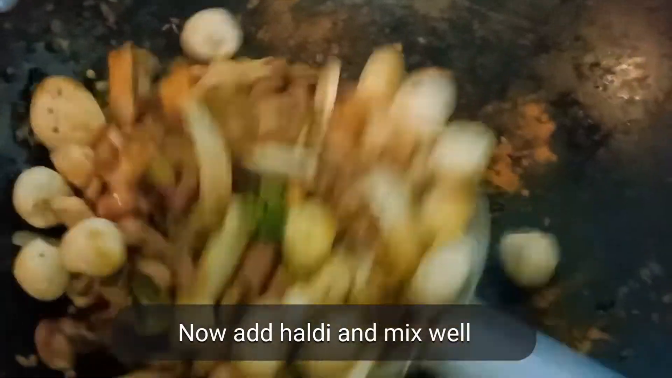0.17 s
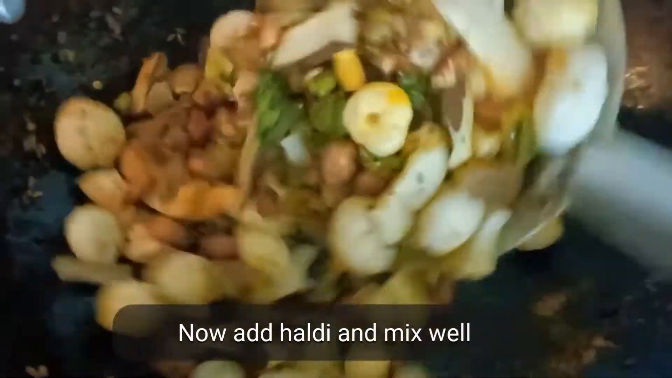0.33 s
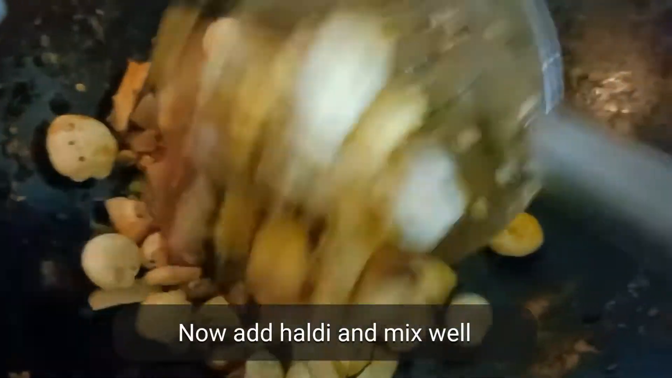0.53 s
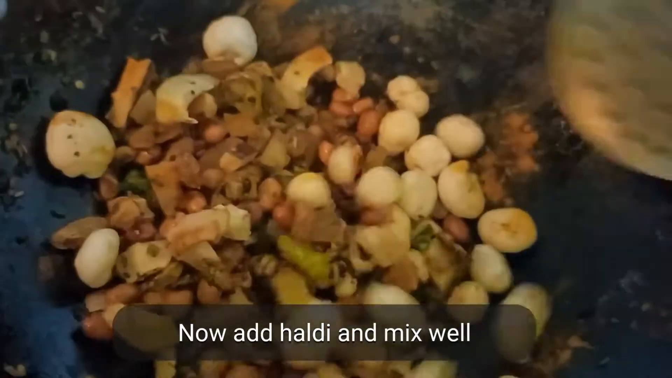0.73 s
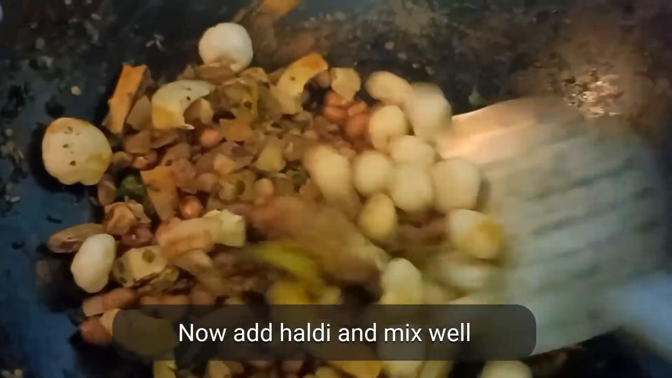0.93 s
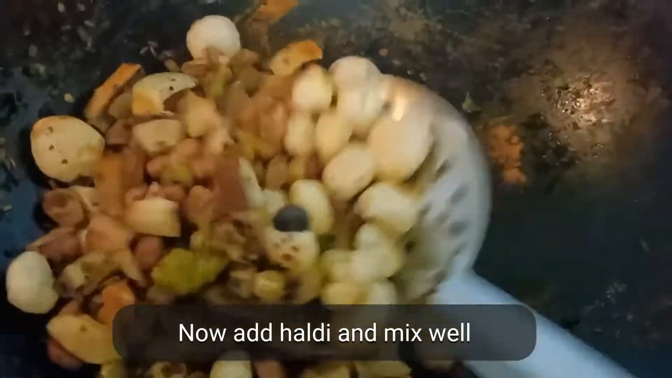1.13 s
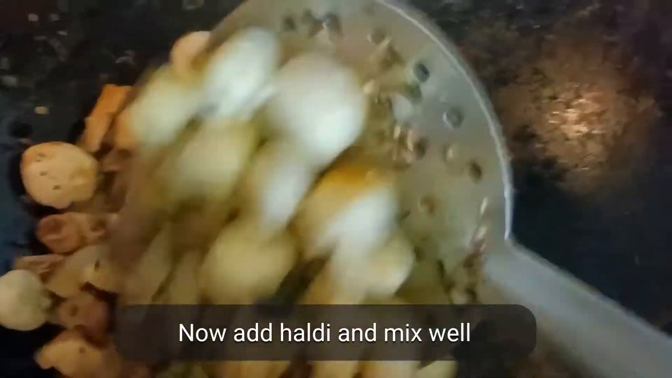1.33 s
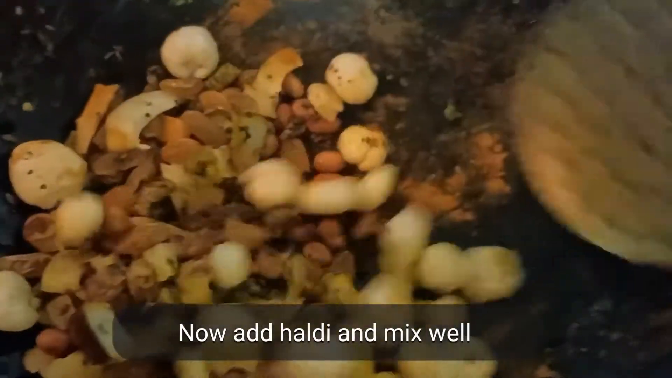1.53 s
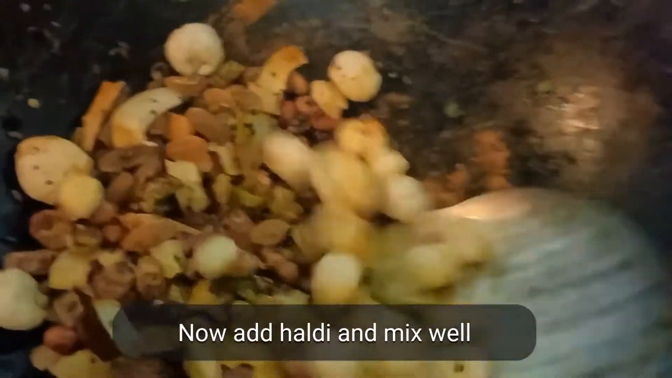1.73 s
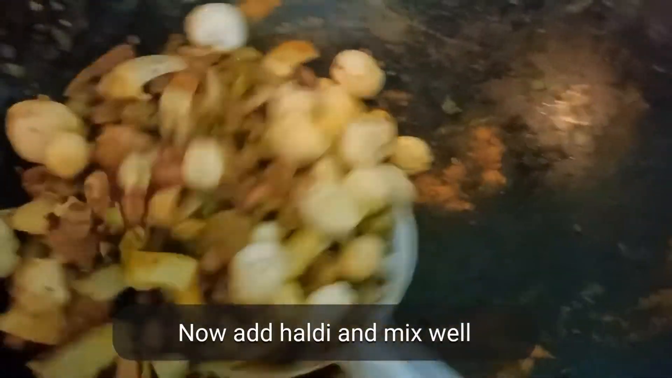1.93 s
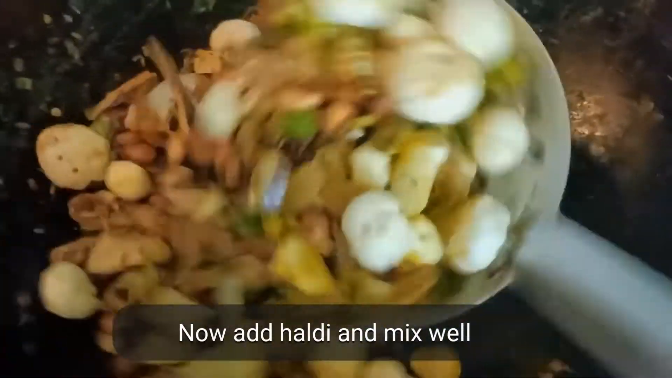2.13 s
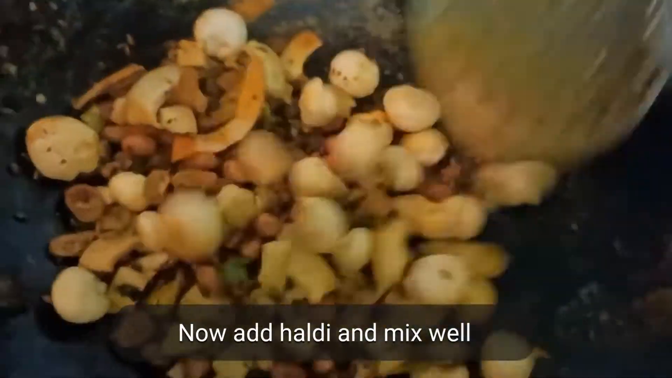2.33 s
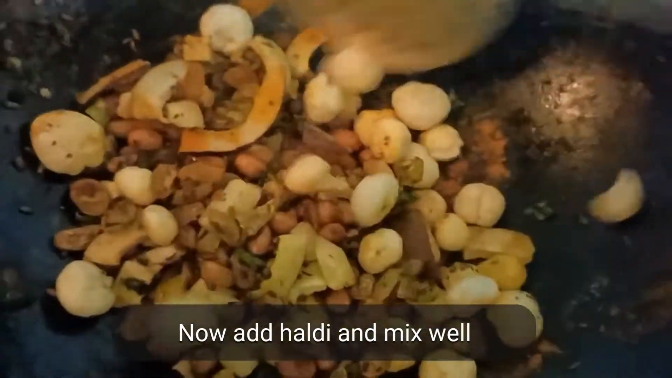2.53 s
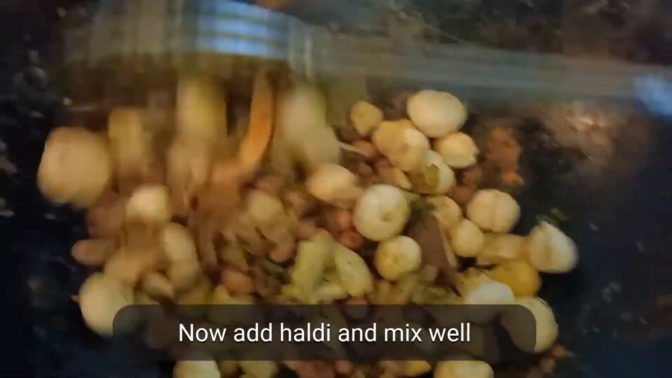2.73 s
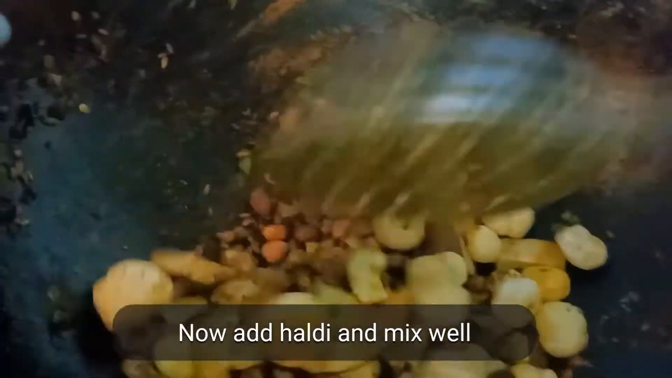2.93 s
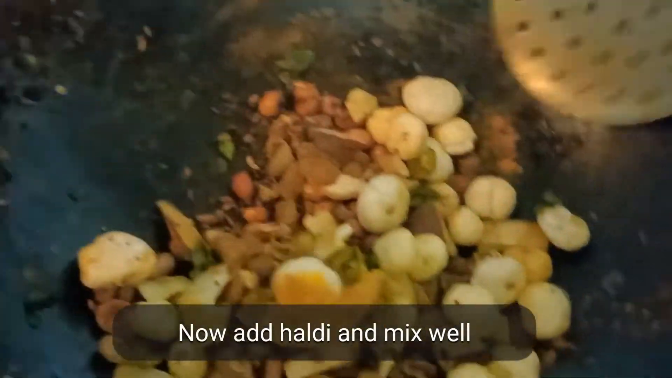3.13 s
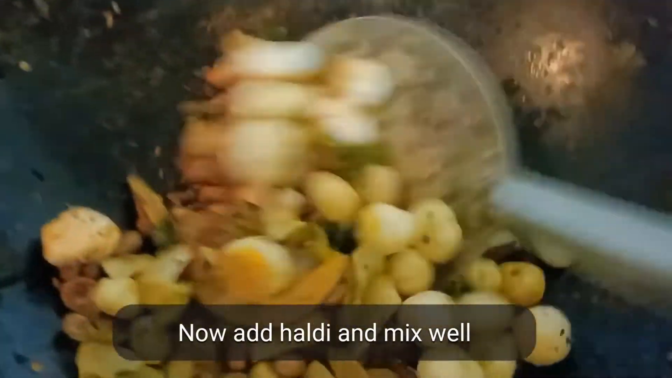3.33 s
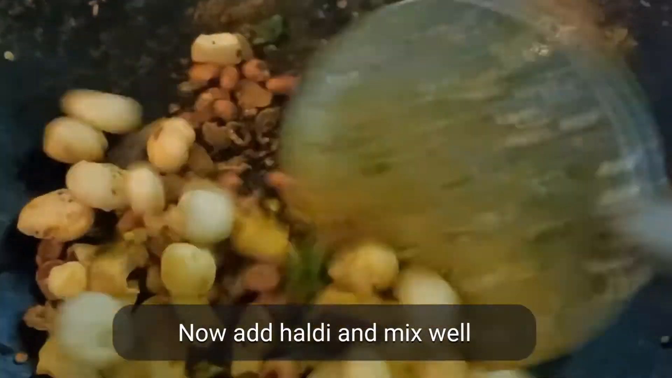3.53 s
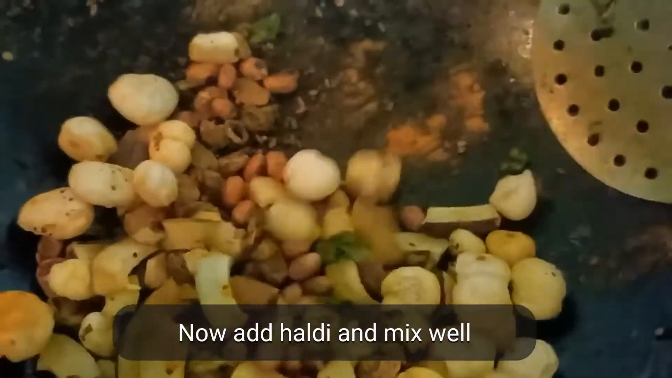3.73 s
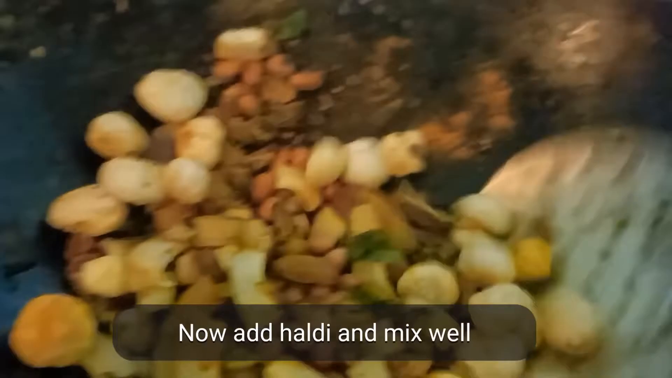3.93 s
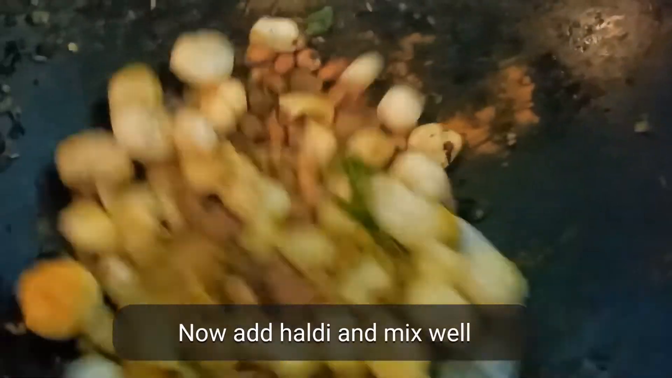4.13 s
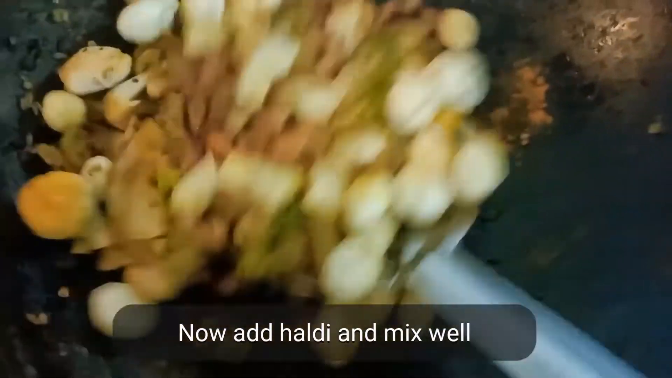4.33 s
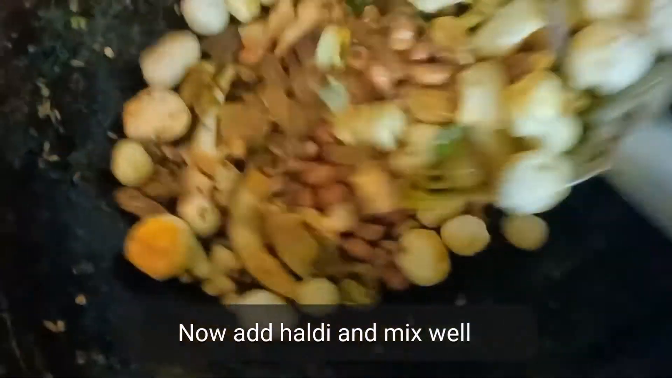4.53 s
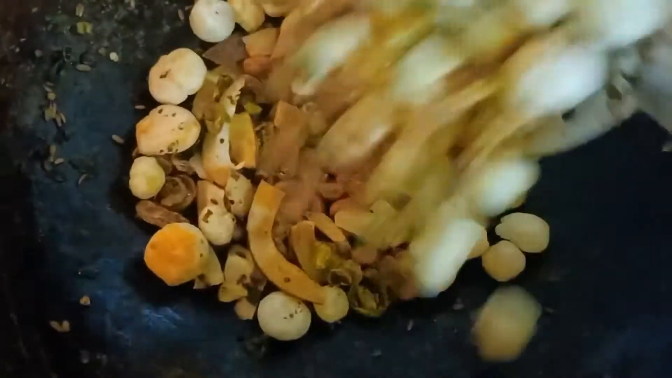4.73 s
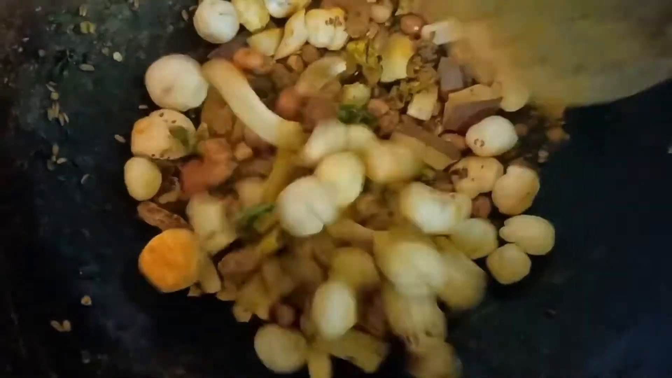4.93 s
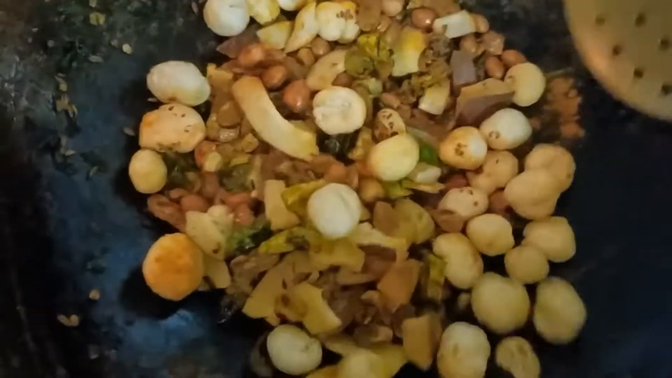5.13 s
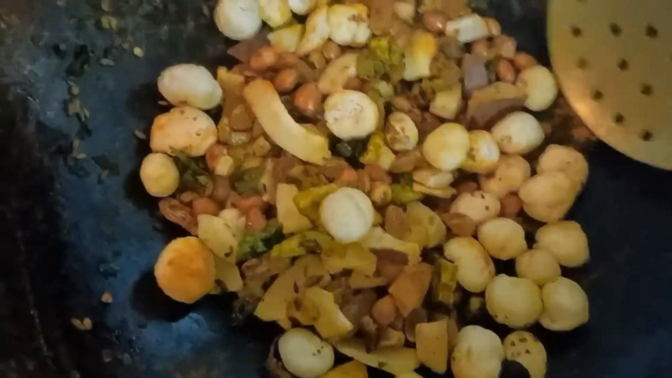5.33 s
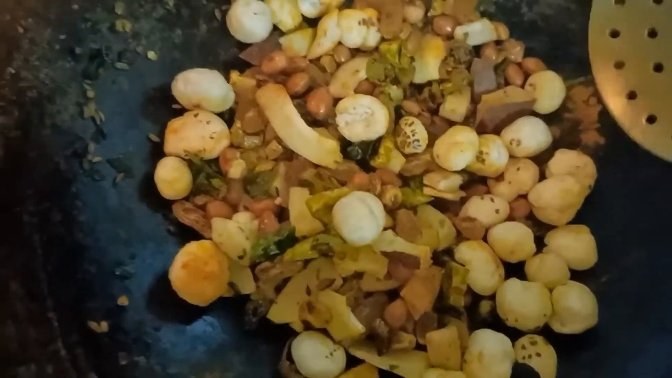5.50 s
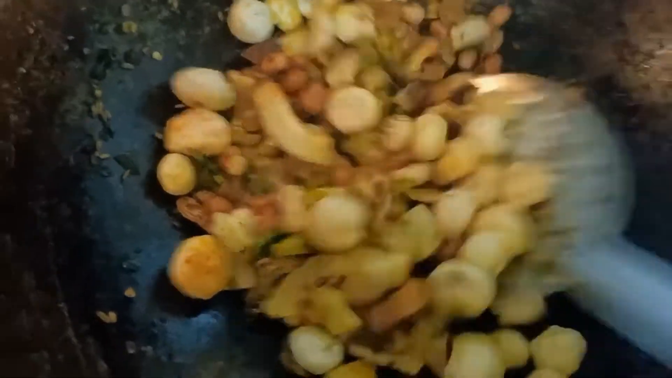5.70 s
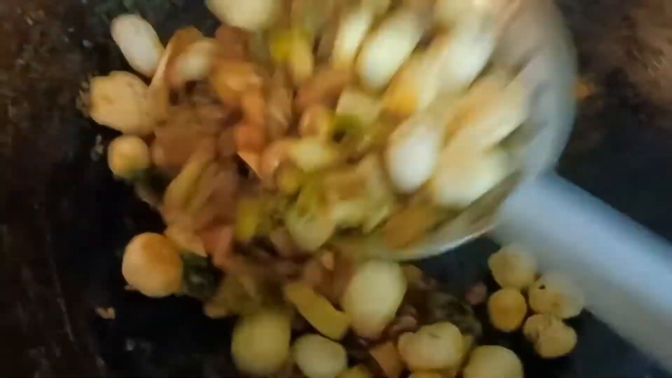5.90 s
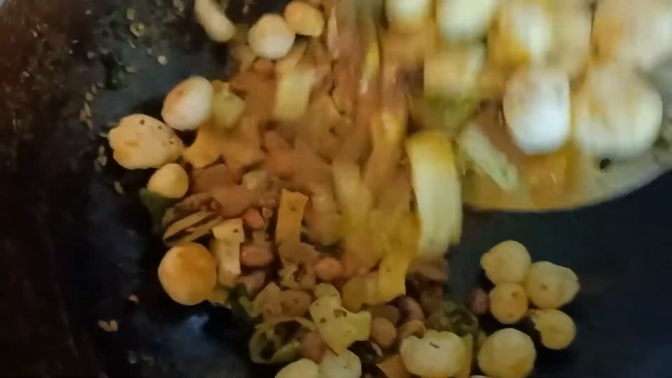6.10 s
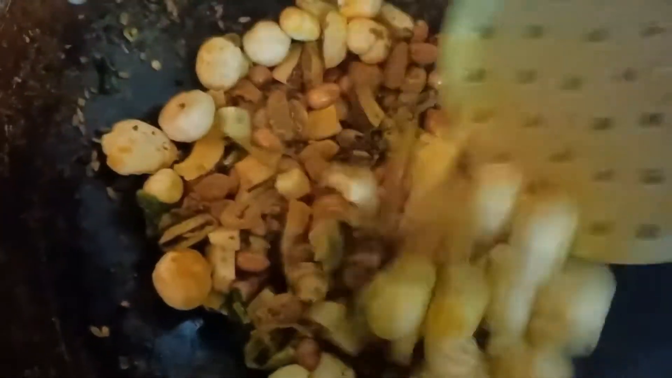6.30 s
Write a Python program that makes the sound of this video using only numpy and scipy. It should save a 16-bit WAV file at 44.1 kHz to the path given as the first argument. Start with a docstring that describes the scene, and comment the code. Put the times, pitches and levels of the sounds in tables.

```python
"""In a kitchen, close by, a perforated steel spatula stirs nuts and coconut flakes roasting in a metal pan.
The blade lands with a clank of bursts and ringing modes, then scrapes along as tiny slips drive steel and pan.
It lifts, and the dry mix slides off and tumbles back: showers of small impacts through flake, nut and steel tones.
Single nuts tap as pitched clicks, one rattles briefly on the blade, and something hollow gives one soft thud.
Shaped noise lays a low rumble and a faint hiss underneath; a short room tail answers the near sounds."""
import sys
import numpy as np
from scipy import signal
from scipy.fft import rfft, irfft, next_fast_len
from scipy.io import wavfile
from scipy.ndimage import uniform_filter1d, map_coordinates

SR = 44100
rng = np.random.default_rng(int(sys.argv[2]) if len(sys.argv) > 2 else 0)


def persist_wave(psi):
    """Save psi, clipped to +-1, as 16-bit WAV."""
    counts = np.round(np.clip(psi, -1, 1) * 32767).astype(np.int16)
    wavfile.write(sys.argv[1], SR, np.atleast_2d(counts).T)


N = 284826  # length in samples

# Colour of the steady hiss. Each row: frequency in Hz, density in dB per Hz.
HISS_SPECTRUM = [(100, -1.5), (250, -7), (500, -4.5), (1500, -7), (3000, -5.5), (6000, -7), (9000, -7.5),
                 (12000, -2), (15500, -13)]
# Colour of the low rumble. Each row: frequency in Hz, density in dB per Hz.
RUMBLE_SPECTRUM = [(15, 7.5), (30, -11.5), (70, -1), (130, -3.0), (190, -11.0), (600, -28.0), (3000, -79)]
# Decay of the room. Each row: frequency in Hz, time to fall by 60 dB in seconds.
ROOM_DECAY = [(200, 0.46), (1500, 0.12), (5000, 0.099), (14000, 0.1)]
# Stereo width. Each row: frequency in Hz, gain of the side signal in dB.
STEREO_WIDTH = [(60, -8), (200, -11), (380, -7), (700, -3), (1300, 0), (2400, 1), (4400, -.5), (8000, -3),
                (15000, -2)]

# One dull rounded thud, built from two overlapping soft pushes. Each row: start in seconds, relative level in dB.
THUD_PUSHES = [(0.529, -23.5), (0.557, -26.5)]
# Hollow modes of the thud. Each row: frequency in Hz, width in Hz, relative level in dB.
THUD_MODES = [(310, 70, -4), (430, 80, -5), (540, 40, 1), (620, 55, -4), (820, 60, -10)]
# Soft push that drives the thud. Each row: frequency in Hz, gain in dB.
PUSH_SPECTRUM = [(120, -25), (280, 0), (800, 0), (1300, -35), (4000, -70)]

# Single nuts tapping pan and blade. Each row: start in seconds, relative level in dB, pitch in Hz,
# relative level of the dry snap in dB, after-ring against the click in dB (before trim).
TAPS = [(0.3256, -35, 5560, -52, 13), (0.4186, -22.5, 5640, -34, -6), (0.637, -17, 2410, -38, -8),
        (0.6903, -30.5, 6460, -26, 5), (1.326, -20, 1820, -55, -2), (1.993, -38, 5240, -24, 10),
        (2.2518, -13, 4530, -41.5, -6.5), (2.438, -22.5, 2500, -50, -12), (3.1266, -34, 5760, -42, -10),
        (3.467, -20, 5930, -44, -5.5), (3.5451, -24.5, 2560, -46, -21), (3.829, -4.5, 3650, -33, -4),
        (4.194, -8.5, 6500, -36, -9), (4.5409, -22, 4700, -44, -4), (4.6868, -30.5, 5000, -54, 9.5),
        (4.8107, -40, 7460, -53, 10.5), (4.862, -20.5, 2700, -15.5, -13), (4.9395, -13.5, 5200, -28, 0),
        (5.137, -40, 5840, -38, 2), (6.3794, -19, 1980, -40, -11), (6.393, -18, 2440, -47, -2)]
# The blade carries the rustling mix. Each row: start in seconds, length in seconds, relative flake level in dB.
CARRIES = [(0.135, 0.76, -49), (1.148, 0.74, -52.5), (1.996, 0.62, -50.5), (2.738, 0.2, -47.5),
           (3.442, 0.58, -50.5), (4.295, 0.71, -51), (5.803, 1, -51.5)]
# A load slides off and falls back. Each row: start in seconds, swell time in seconds, settling in dB per second,
# then the relative levels of flakes, nuts and sliding on steel in dB.
SPILLS = [(0.3, 0.09, 52, -51, -46.5, -52), (0.605, 0.029, 110, -33, -46, -46),
          (1.47, 0.049, 129, -37, -52, -66), (2.301, 0.087, 157, -34, -49.5, -41),
          (2.8, 0.049, 91.5, -43.5, -71, -42.5), (3.571, 0.07, 68, -46.5, -60, -52),
          (4.49, 0.05, 160, -45.5, -48, -51), (4.845, 0.15, 121, -35.5, -46, -46.5),
          (5.86, 0.042, 72, -53, -71, -45.5), (6.14, 0.03, 260, -42, -52.5, -49),
          (6.3, 0.078, 17, -39, -48, -50)]
# Crackle of flakes and dry skins. Each row: frequency in Hz, density in dB per Hz.
FLAKE_SPECTRUM = [(1000, -14.5), (3000, -3.5), (3700, -15), (6000, -10), (8500, -5.5), (12500, 1),
                  (14500, -5.5), (16000, -6)]
# Patter of nuts. Each row: frequency in Hz, density in dB per Hz.
NUT_SPECTRUM = [(100, -7), (250, -3), (600, 2.5), (1400, -2), (2600, -2), (3500, -3), (6000, 5.5),
                (14000, -31)]

# The blade strikes or catches on the pan. Each row: start in seconds, relative level of the strike in dB,
# relative level of the pan body in dB, time of the chatter to fall by 60 dB in seconds.
CLANKS = [(0.0318, -5, -37, 0.1), (0.1021, -6.5, -30.5, 0.023), (0.8393, -7, -27.5, 0.043),
          (0.9374, -28, -39, 0.054), (1.0818, -6, -58, 0.05), (1.6685, -7, -26, 0.098),
          (2.4932, -9, -26.5, 0.032), (2.5018, -7.5, -34, 0.17), (3.2162, -10, -21.5, 0.11),
          (3.2354, -8.5, -31.5, 0.14), (3.827, -10.5, -26, 0.082), (3.8432, -14, -28, 0.029),
          (3.922, -11.5, -48, 0.06), (4.0654, -6.5, -46, 0.036), (4.2274, -11, -59, 0.091),
          (5.5126, -13.5, -47.5, 0.054), (5.5949, -22, -50, 0.042)]
# Bright crack of the strike. Each row: frequency in Hz, density in dB per Hz.
CRACK_SPECTRUM = [(100, -51), (300, 12.5), (1100, -36), (1700, -11), (3500, 3.5), (6000, 11.5), (7200, 2),
                  (8700, -1), (10000, -1), (12000, 7), (15500, -51)]
# Hollow knock of the pan. Each row: frequency in Hz, density in dB per Hz.
KNOCK_SPECTRUM = [(120, -49.5), (190, 2), (270, 3), (400, -3.5), (520, -17), (620, -10), (1100, -4.5),
                  (1500, -18.5), (4000, -44)]

# Pushes of the blade across the pan, and one brief rattle of a nut on the blade (the row at 4.925 s).
# Each row: start in seconds, swell time in seconds, hold time in seconds, release in dB per second,
# then the relative levels of scrape, gritty edge and pressure on the pan in dB.
STROKES = [(0.004, 0.0063, 0.13, 192, -25.5, -25.5, -32), (0.921, 0.067, 0.026, 158, -21.5, -25.5, -25.5),
           (1.669, 0.12, 0.1, 178, -25.5, -27.5, -33), (2.52, 0.098, 0.11, 187, -23, -27.5, -39.5),
           (3.276, 0.07, 0.029, 200, -26, -29.5, -31), (3.912, 0.05, 0.052, 121, -22.5, -28, -35),
           (4.034, 0.033, 0.023, 125, -21.5, -31, -26), (4.185, 0.046, 0.0078, 165, -27, -34.5, -31),
           (4.925, 0.01, 0.0054, 188, -32, -52, -35), (5.62, 0.068, 0.075, 142, -29.5, -30, -32)]
# Resonances of the blade. Each row: frequency in Hz, width in Hz, relative level in dB.
BLADE_MODES = [(3050, 27, -45), (3060, 11.3, 1), (3830, 71, -5), (3760, 20, -28), (4000, 9.7, 6),
               (4505, 48, 4), (4827, 19, 5.5), (5290, 7.1, 5.5), (5730, 15, -25), (5790, 23, 8.5),
               (6310, 32, 9), (6170, 19.5, -5.5), (7120, 19, 1), (7300, 33, -5), (7960, 88, 3.5),
               (8760, 33, -16.5)]
# High resonances of the blade edge. Each row: frequency in Hz, width in Hz, relative level in dB.
EDGE_MODES = [(9570, 110, -2), (9800, 80, -1), (9990, 60, 0), (11100, 90, 0), (11730, 90, 1),
              (11970, 70, 1), (13500, 300, -8), (14600, 200, -9)]
# Low resonances of the pan. Each row: frequency in Hz, width in Hz, relative level in dB.
PAN_MODES = [(205, 10, 0), (288, 24, -9.5), (384, 20, -12.5), (470, 40, -19), (597, 30, -15),
             (700, 40, -21), (850, 30, -19), (990, 40, -20), (1088, 36, -16.5), (1880, 70, -26)]
# Upper resonances of the pan wall. Each row: frequency in Hz, width in Hz, relative level in dB.
WALL_MODES = [(1620, 41, -5), (2030, 25, -4), (2305, 24, -13), (2428, 27, 8), (2670, 32, -14),
              (2897, 61, 2), (3113, 28, -6), (3160, 100, 4)]
# Grinding of the blade. Each row: frequency in Hz, density in dB per Hz.
GRIND_SPECTRUM = [(1500, -17), (2800, -29), (3500, 0), (4600, 6), (6300, 7.5), (7000, 1), (7900, 1),
                  (8700, -24), (12000, -9.5)]
# Fine grit under the edge. Each row: frequency in Hz, density in dB per Hz.
GRIT_SPECTRUM = [(5000, -28), (8700, 2), (9700, 5.5), (10600, 7.5), (11800, 5), (13000, 7), (14100, 5),
                 (15000, -11), (16000, -3)]
# Growl of crumbs crushed on the pan. Each row: frequency in Hz, density in dB per Hz.
GROWL_SPECTRUM = [(150, -28), (400, -17), (900, -1), (1500, -18.5), (2000, -1.5), (2500, 13), (3100, 3),
                  (4000, 10), (8000, -66)]
# Lift of the upper pan modes under a scrape. Each row: frequency in Hz, gain in dB.
BOWL_TILT = [(200, 0), (900, 8), (2000, 8)]

TOP_HZ = 15650
SCRAPE_SWELL_DB = 20  # the blade starts this far below its full bite
SAG_DB_PER_S = 22  # the push slackens as the blade climbs the pan wall
PRESSURE_EXPONENT = 1.19  # the load on the pan swings wider than the scrape
CARRY_RISE_S, SETTLE_DB_PER_S = 0.03, 143
CARRY_NUTS_DB, CARRY_SLIDE_DB = -6.5, -5  # against the flakes
MIX_SWELL_DB = 25  # the first pieces to move are this far below the full load
# Faint taps of loose nuts while the mix is carried; levels on the scale of TAPS
STRAY_TAPS_PER_S, STRAY_DB, STRAY_SPREAD_DB = 3, -36, 4
STRAY_HZ, STRAY_SPREAD_OCTAVES, STRAY_SNAP_DB, STRAY_RING_DB = 5500, 0.5, -50, -6
CONTACT_S = np.arange(SR // 3) / SR  # seconds after a contact


def amp(db):
    """Decibels to gain."""
    return 10 ** (np.asarray(db) / 20)


def unit(x):
    """Scale to rms 1."""
    return x / np.sqrt(np.mean(x ** 2) + 1e-20)


def neutral(h):
    """Scale impulse responses to energy 1."""
    return h / np.sqrt(np.sum(h ** 2, axis=-1, keepdims=True) + 1e-20)


def along(points, hz):
    """Read (Hz, value) points along a log frequency axis."""
    f, v = np.transpose(points)
    return np.interp(np.log(hz + 1), np.log(f + 1), v)


def wobble(rate):
    """A smooth random curve with rate knots a second."""
    knots = rng.standard_normal(int(N * rate / SR) + 4)
    return map_coordinates(knots, [np.arange(N) * rate / SR])


def through(x, h):
    """Play x through an impulse response, keeping its length."""
    return signal.fftconvolve(np.atleast_2d(x), np.atleast_2d(h), axes=1)[:, :x.shape[-1]]


def add(track, start, x):
    """Mix x into the track at a start in seconds."""
    part = track[:, max(round(start * SR), 0):][:, :x.shape[-1]]
    part += x[:, :part.shape[1]]


def colour(points, size=2048):
    """Causal impulse response with the given spectrum, by folding its cepstrum."""
    log_spectrum = np.log(amp(along(points, np.fft.rfftfreq(size, 1 / SR))))
    cepstrum = irfft(log_spectrum)
    cepstrum[1:size // 2] *= 2
    cepstrum[size // 2 + 1:] = 0
    return neutral(irfft(np.exp(rfft(cepstrum))))


def burst(t60):
    """Mid and side of a dying cloud of unresolved vibrations, down 60 dB after t60 seconds."""
    return neutral(rng.standard_normal((2, len(CONTACT_S))) * amp(-60 * CONTACT_S / t60))


def ringing(modes, vary_db, scatter):
    """Mid and side of decaying modes; each radiates in a direction of its own."""
    h = 0
    for hz, width, db in modes:
        size, turn = rng.standard_normal(2)
        phase = np.array([[0], [scatter * turn]])  # radians, mid and side
        decay = np.exp(-np.pi * width * CONTACT_S)  # a wider mode dies faster
        h = h + amp(db + vary_db * size) * width * decay * np.sin(2 * np.pi * hz * CONTACT_S + phase)
    return neutral(h)


def pan_ring(vary_db):
    """The pan's modes; the open bowl radiates almost nothing below the lowest one."""
    low_cut = signal.butter(6, 185, "highpass", fs=SR, output="sos")
    return neutral(signal.sosfilt(low_cut, ringing(PAN_MODES, vary_db, scatter=.6)))


def contacts(rate, spread_db):
    """Tiny random impacts, rate a second, from all directions as mid and side; spread makes a few larger."""
    hit = rng.random(N) < rate / SR
    size = amp(spread_db * np.minimum(rng.exponential(size=N), 4))
    return unit(hit * size * rng.standard_normal((2, N)))


def shifting(x, depth_db, bins=3):
    """A travelling contact point favours changing groups of modes."""
    z = signal.stft(x, nperseg=512)[2]
    field = uniform_filter1d(rng.standard_normal(z.shape[1:]), size=bins, axis=0)  # across frequency
    field = uniform_filter1d(field, size=7, axis=1)  # along time
    emphasis = unit(amp(depth_db * unit(field)))
    return signal.istft(z * emphasis, nperseg=512)[1][:, :N]


def gesture(start, swell_s, hold_s, release_db_per_s, depth_db, sag_db_per_s=0):
    """Gain of one movement: a rounded swell, a hold that may sag and an even release."""
    t = np.arange(N) / SR - start
    swell = depth_db * np.clip(1 - t / max(swell_s, 1 / SR), 0, 1) ** 2
    sag = sag_db_per_s * np.maximum(t - swell_s, 0)
    release = release_db_per_s * np.maximum(t - swell_s - hold_s, 0)
    return (t >= 0) * amp(-swell - sag - release)


def background():
    """Low rumble with a slight drift in level and steady faint hiss, both noise shaped by a spectrum."""
    hiss = unit(through(rng.standard_normal((2, N)), colour(HISS_SPECTRUM)))
    rumble = unit(through(rng.standard_normal((2, N)), colour(RUMBLE_SPECTRUM)))
    return amp(-60) * hiss + amp(-57 + 0.95 * wobble(5)) * rumble


def kitchen(x):
    """Hard walls answer with a noise tail after 5 ms; its decay time depends on frequency."""
    hz, t, z = signal.stft(rng.standard_normal((2, SR // 2)), SR, nperseg=256)
    decay = amp(-60 * t / along(ROOM_DECAY, hz)[:, None])
    tail = signal.istft(z * decay, SR, nperseg=256)[1]
    return through(x, neutral(np.pad(tail, ((0, 0), (SR // 200, 0)))))


def thud():
    """Something hollow is nudged: two overlapping soft pushes drive its modes into one rounded thud."""
    out = np.zeros((2, N))
    for start, db in THUD_PUSHES:
        soft = through(burst(.05), colour(PUSH_SPECTRUM))
        hollow = ringing(THUD_MODES, vary_db=1, scatter=.8)
        add(out, start, amp(db + 18) * neutral(through(soft, hollow)))
    return out


def stray_taps():
    """Rows like those of TAPS for loose nuts that touch the steel at random during each carry."""
    rows = []
    for start, length_s, _ in CARRIES:
        times = start + np.cumsum(rng.exponential(size=8)) / STRAY_TAPS_PER_S
        for time, (strength, pitch) in zip(times, rng.standard_normal((len(times), 2))):
            if time < start + length_s:
                db = STRAY_DB + STRAY_SPREAD_DB * strength
                hz = STRAY_HZ * 2 ** (STRAY_SPREAD_OCTAVES * pitch)
                rows.append((time, db, hz, STRAY_SNAP_DB, STRAY_RING_DB))
    return rows


def taps():
    """A hard nut gives a pitched click, the snap of its dry skin and a short after-ring of the steel."""
    out = np.zeros((2, N))
    for start, db, hz, snap_db, ring_db in [*TAPS, *stray_taps()]:
        band = colour([(hz / 8, -28), (hz / 2, -14), (hz, 0), (hz * 1.36, -14), (hz * 4, -36)])
        click = amp(db + 5.5) * neutral(through(burst(0.014), band))
        snap = amp(snap_db + 12.5) * through(burst(0.0091), colour(FLAKE_SPECTRUM))
        mode = ringing([(hz, hz / 14, 0)], vary_db=0, scatter=1)
        ring = amp(db + ring_db + 11) * neutral(through(burst(0.13), mode))
        add(out, start, click + snap + ring)
    return out


def mix_motion():
    """Gains of flakes, nuts and sliding: a low rustle while the mix is carried, and a surge at each spill."""
    power = np.zeros((3, N))
    for start, length_s, db in CARRIES:
        carry = gesture(start, CARRY_RISE_S, length_s - CARRY_RISE_S, SETTLE_DB_PER_S, MIX_SWELL_DB)
        levels_db = [db, db + CARRY_NUTS_DB, db + CARRY_SLIDE_DB]
        power += np.outer(amp(levels_db), carry) ** 2
    for start, swell_s, settling, *levels_db in SPILLS:
        spill = gesture(start, swell_s, 0, settling, MIX_SWELL_DB)
        power += np.outer(amp(levels_db), spill) ** 2
    return np.sqrt(power)


def tumbling():
    """Flakes crackle, nuts patter on the pan, and the load tickles the steel as it slides over it."""
    flake_gain, nut_gain, slide_gain = mix_motion()
    clumps = amp(1.7 * wobble(70))  # pieces fall in uneven clumps
    pan_modes = pan_ring(vary_db=1)
    steel_modes = ringing(BLADE_MODES[5:14], vary_db=1, scatter=2.5)
    crackle = flake_gain * clumps * contacts(rate=6000, spread_db=2.5)
    flakes = through(crackle, colour(FLAKE_SPECTRUM))
    patter = nut_gain * clumps * contacts(rate=1000, spread_db=0)
    nuts = through(patter, colour(NUT_SPECTRUM)) + amp(-11.5) * through(patter[0], pan_modes)
    slide = through(slide_gain * contacts(rate=1200, spread_db=0), steel_modes)
    return shifting(flakes + nuts + slide, depth_db=4.5, bins=5)


def clanks():
    """The striking blade chatters and rings briefly; the pan answers with a hollow knock and a low bong."""
    out = np.zeros((2, N))
    for start, db, body_db, chatter_s in CLANKS:
        chatter = burst(max(chatter_s, .01))
        steel_modes = ringing([*BLADE_MODES, *EDGE_MODES], vary_db=3, scatter=2.5)
        crack = through(amp(3.5) * chatter + amp(8) * burst(0.18), colour(CRACK_SPECTRUM))
        steel = amp(3) * neutral(through(chatter, steel_modes))
        knock = amp(18) * neutral(through(burst(0.18), colour(KNOCK_SPECTRUM)))
        bong = amp(22) * pan_ring(vary_db=3)
        add(out, start, amp(db) * (crack + steel) + amp(body_db) * (knock + bong))
    return out


def stroke_motion():
    """Gains of scrape, gritty edge and pan pressure: the strongest stroke counts, and the level judders."""
    gains = np.zeros((3, N))
    for start, swell_s, hold_s, release, scrape_db, edge_db, pressure_db in STROKES:
        push = gesture(start, swell_s, hold_s, release, SCRAPE_SWELL_DB, SAG_DB_PER_S)
        load = push ** PRESSURE_EXPONENT
        gains = np.maximum(gains, [amp(scrape_db) * push, amp(edge_db) * push, amp(pressure_db) * load])
    return gains * amp(1.46 * wobble(130) + 0.28 * wobble(35.03))  # the hand's push judders


def slips():
    """The edge catches and lets go in thousands of tiny slips a second."""
    return contacts(rate=9300, spread_db=2.5)


def scraping():
    """The edge sticks and slips over the gritty pan, driving blade and pan modes; one brief nut rattle joins in."""
    force, bite, pressure = stroke_motion()
    blade = amp(-5) * through(force * slips(), ringing(BLADE_MODES, vary_db=2.5, scatter=1.5))
    grind = amp(-3) * through(force * slips(), colour(GRIND_SPECTRUM))
    edge = through(bite * slips(), ringing(EDGE_MODES, vary_db=1.5, scatter=0.61))
    grit = amp(-4) * through(bite * slips(), colour(GRIT_SPECTRUM))
    crush = pressure * contacts(rate=2500, spread_db=0.5)  # coarse crumbs caught under the edge
    wall = amp(-8) * through(crush, ringing(WALL_MODES, vary_db=2.5, scatter=.9))
    growl = amp(-7) * through(crush, colour(GROWL_SPECTRUM))
    bowl = neutral(through(pan_ring(vary_db=1), colour(BOWL_TILT)))
    pan = amp(-11.5) * through(crush[0], bowl)
    steel_side = shifting(blade + grind + edge + grit, depth_db=3.8, bins=2)
    pan_side = shifting(wall + growl + pan, depth_db=4.5, bins=2)
    return steel_side + pan_side


def scene():
    """All sources as mid and side, opened to left and right with a width that depends on frequency."""
    near = thud() + taps() + tumbling() + clanks() + scraping()
    mid, side = background() + amp(-11) * kitchen(near) + near
    width = amp(along(STEREO_WIDTH, np.fft.rfftfreq(N, 1 / SR)))
    side = irfft(rfft(side) * width, N)
    return np.array([mid + side, mid - side])


def record(dry):
    """The treble ends sharply: nothing passes from the band limit upward."""
    size = next_fast_len(N + SR // 4)
    passed = np.fft.rfftfreq(size, 1 / SR) < TOP_HZ
    return irfft(rfft(dry, size) * passed, size)[:, :N]


dry = scene()
out = record(dry)
persist_wave(out)
```